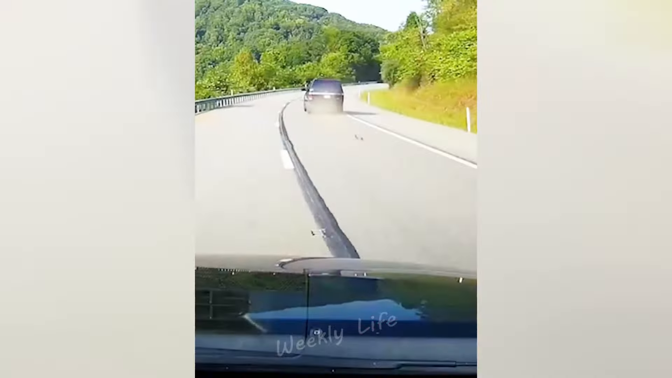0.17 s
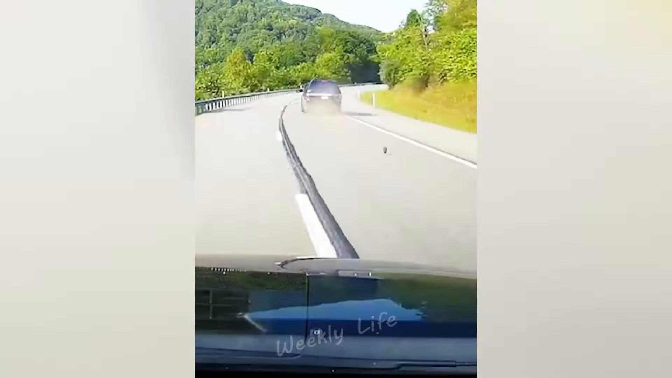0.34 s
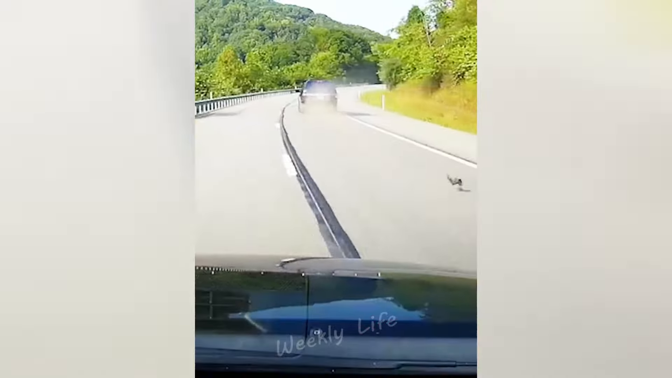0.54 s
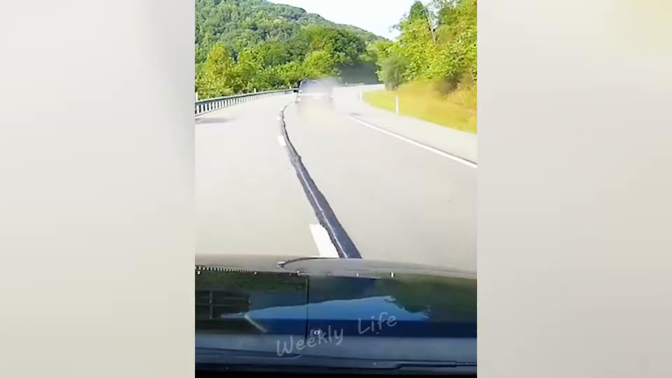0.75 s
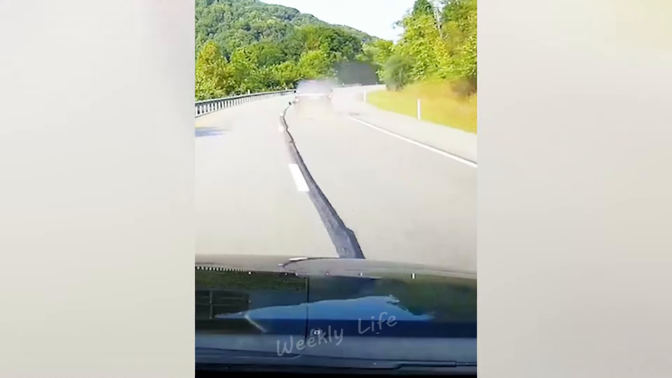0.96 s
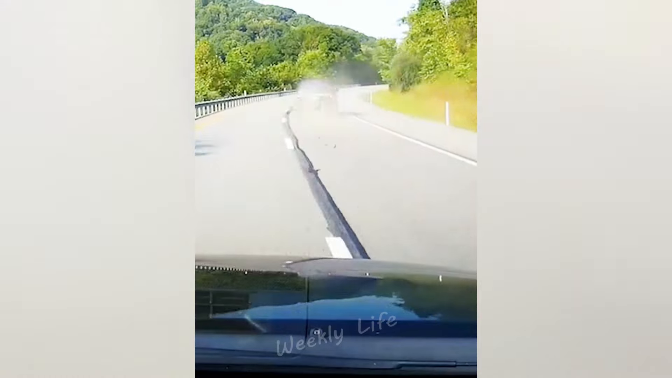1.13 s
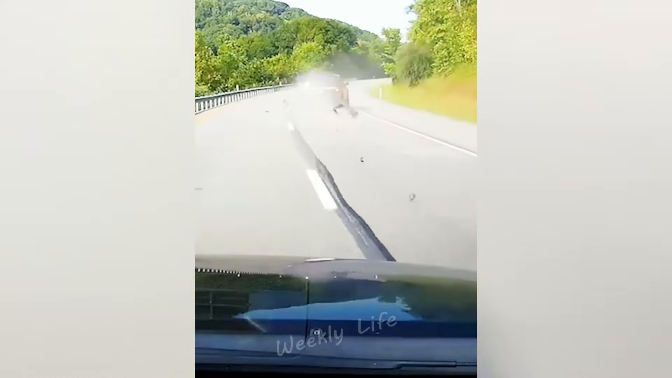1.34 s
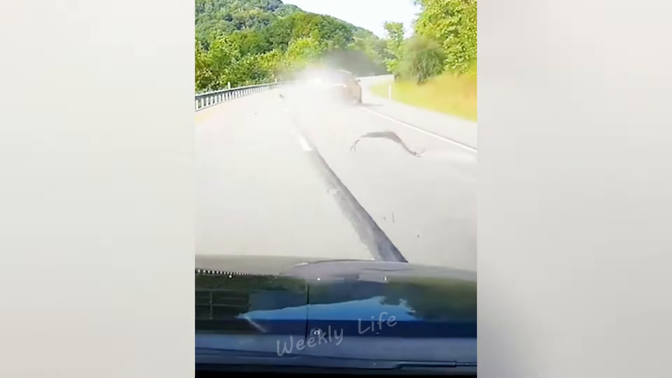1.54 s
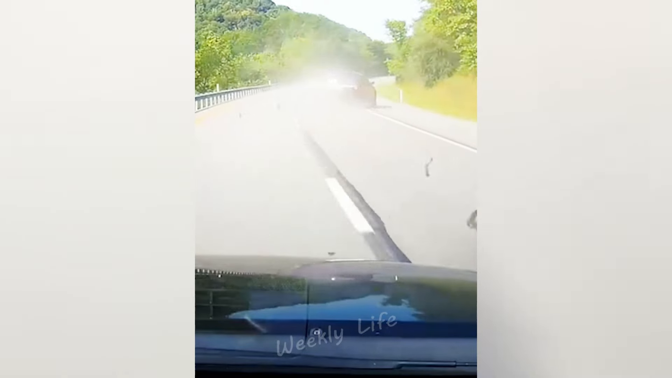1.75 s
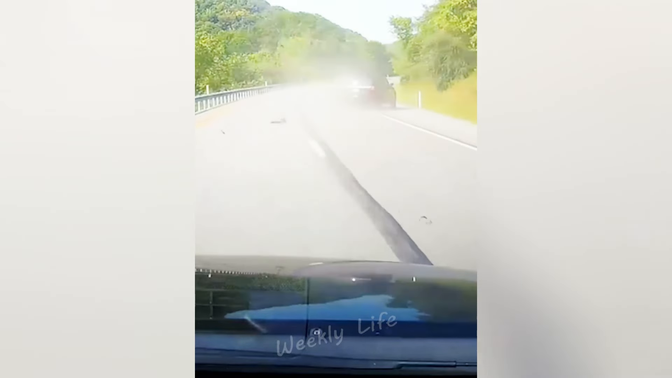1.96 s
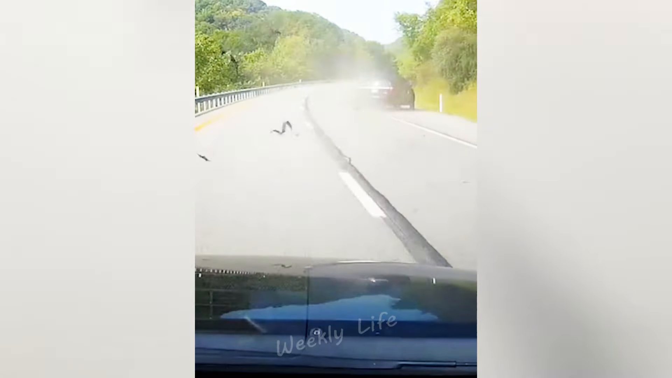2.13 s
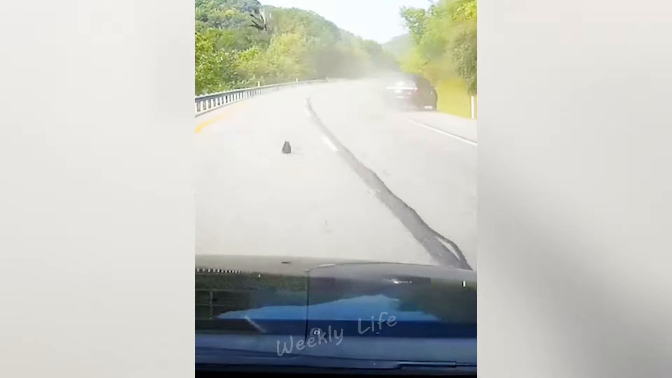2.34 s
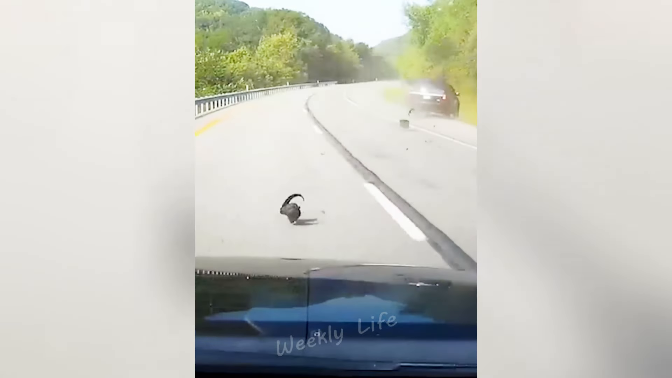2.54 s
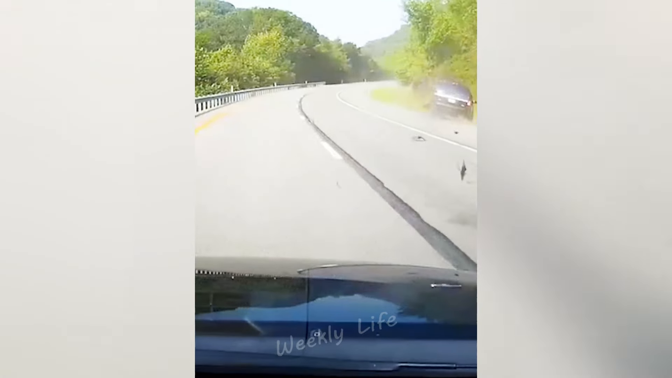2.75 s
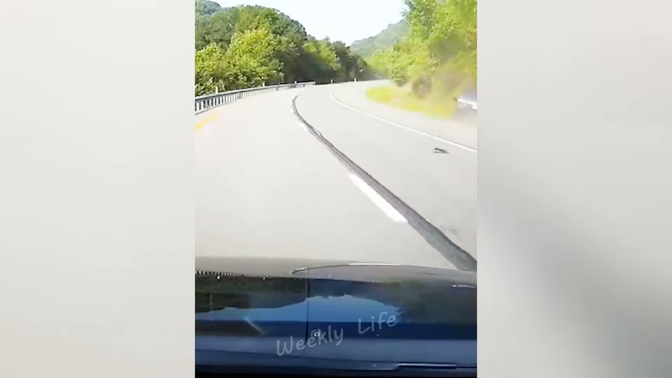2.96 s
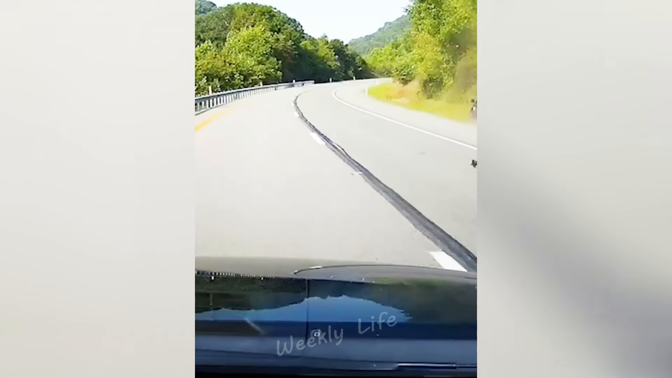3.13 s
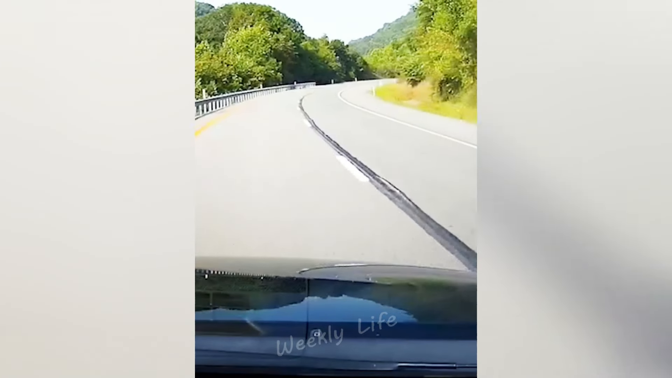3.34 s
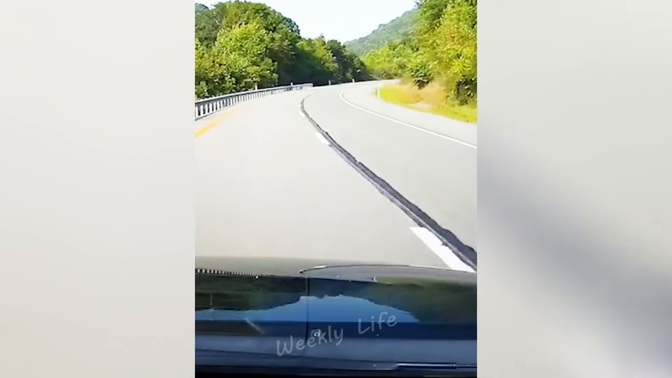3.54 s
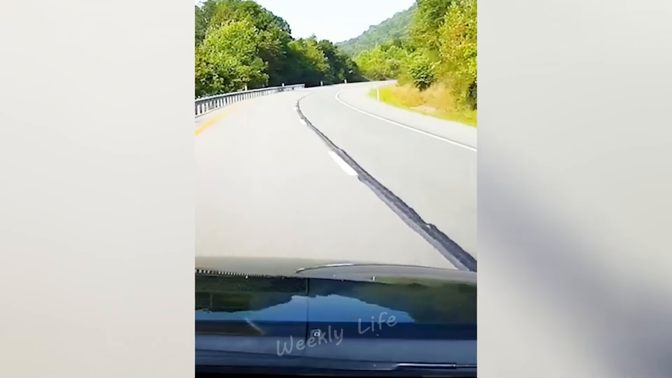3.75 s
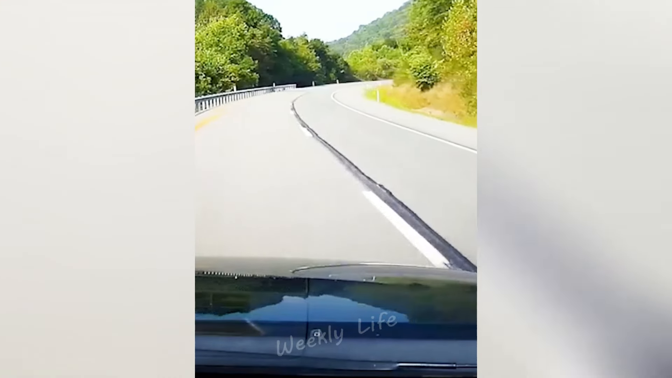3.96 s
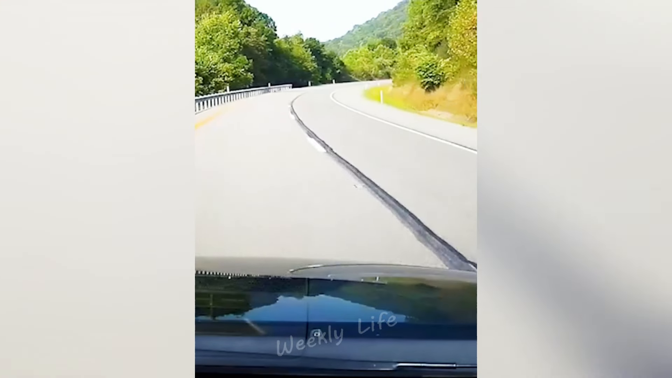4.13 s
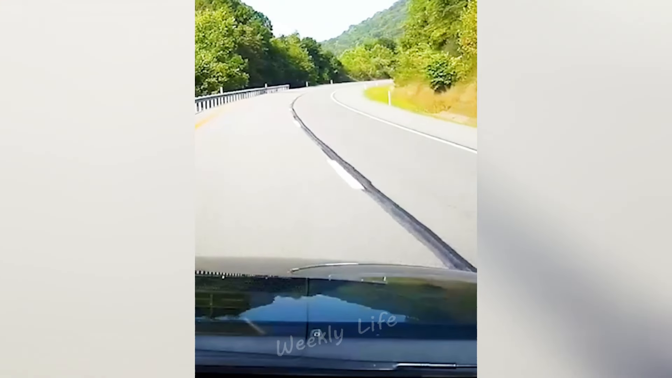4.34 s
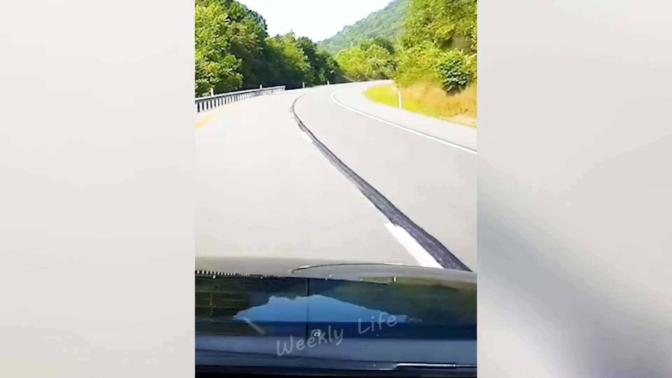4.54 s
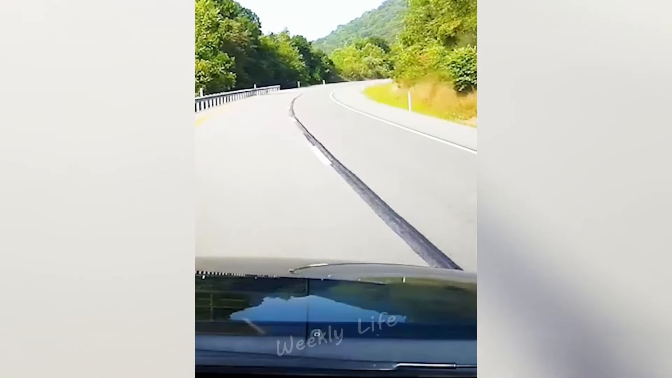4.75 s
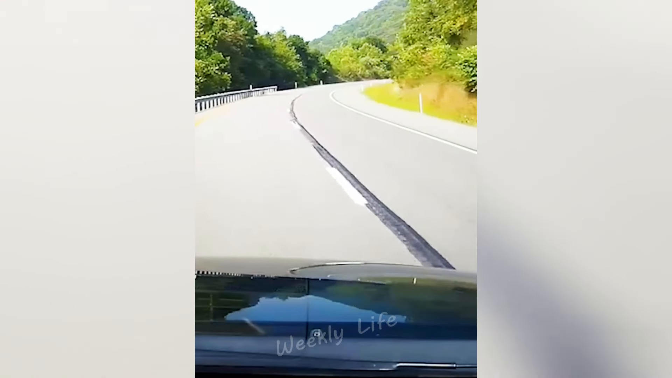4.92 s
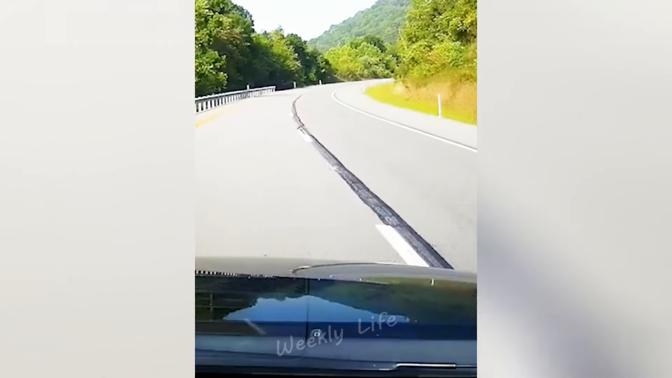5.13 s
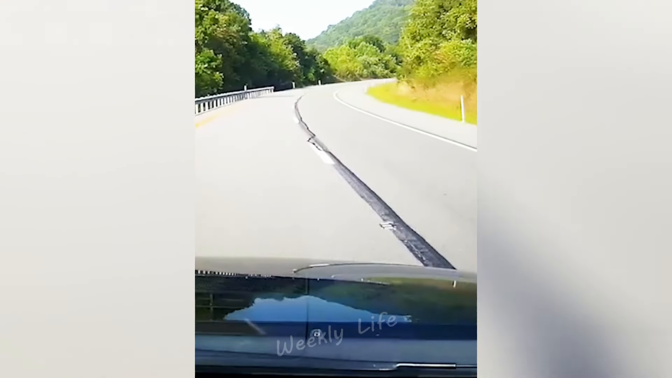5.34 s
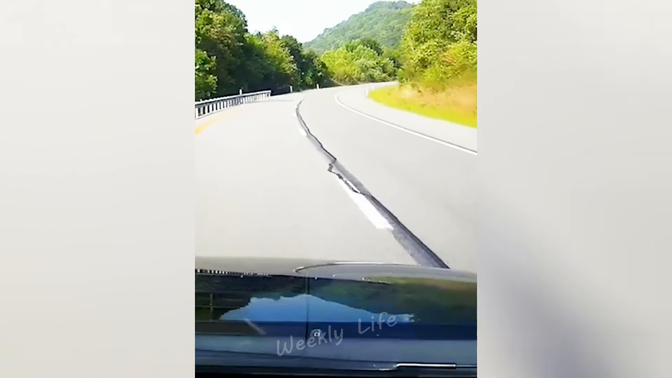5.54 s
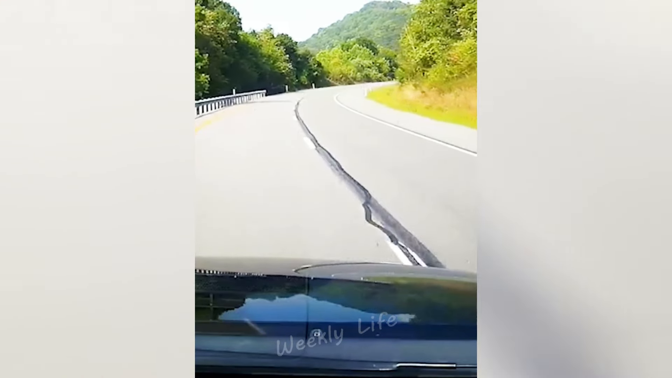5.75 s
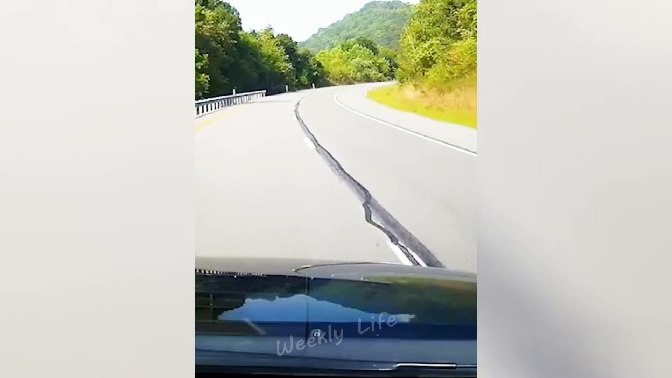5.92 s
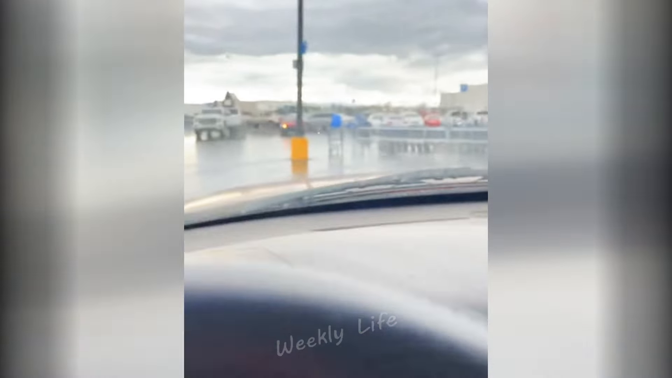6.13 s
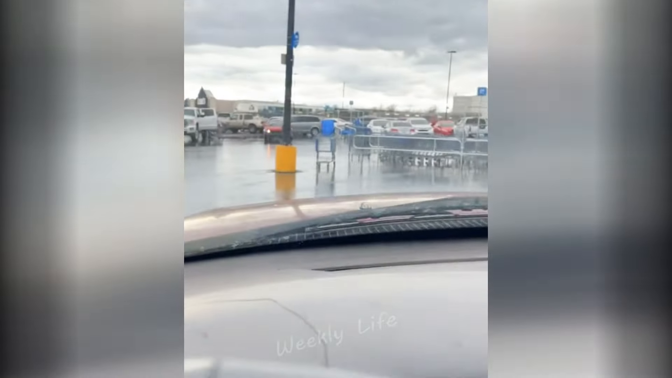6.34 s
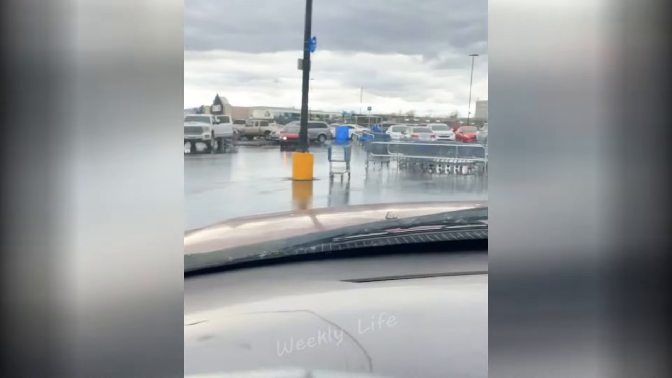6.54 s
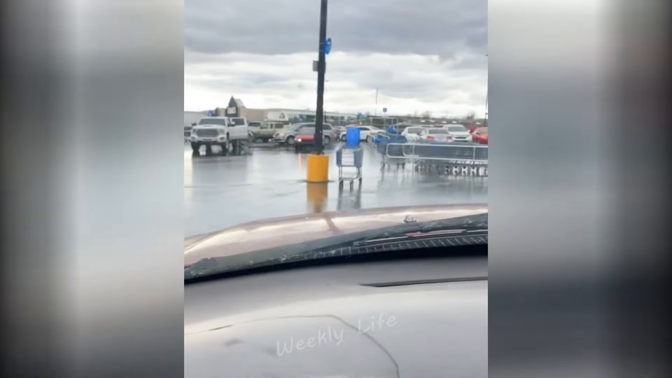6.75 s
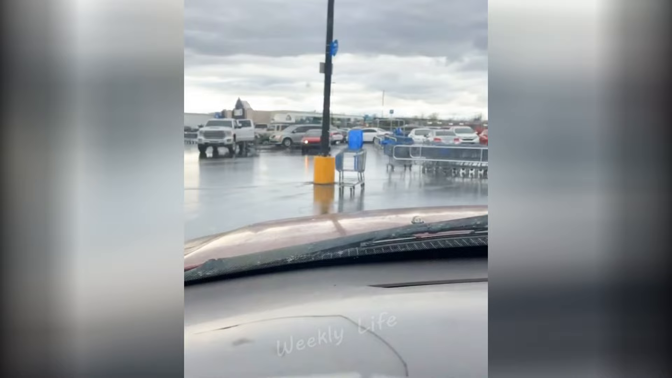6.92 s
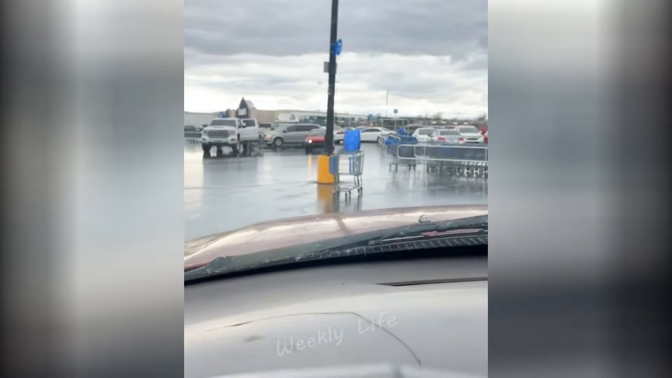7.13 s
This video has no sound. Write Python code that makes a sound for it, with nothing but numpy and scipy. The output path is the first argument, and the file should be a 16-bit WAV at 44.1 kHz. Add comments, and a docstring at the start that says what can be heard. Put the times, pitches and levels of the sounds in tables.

```python
"""A car ahead skids on a country road: its tyres squeal in wandering partials. In our cabin, bumps over road seams
and knocks on the body thud as short-lived panel tones, the hardest overloading the microphone; ticks and scrapes,
some of them the bright cracks of the blows, are swelling bursts of noise. Around them lie tyre roar, wind and dust
as coloured noise, and a wavering low boom. After a short silence comes a second cabin: a parked car idles as rumbling
noise in hissing rain, while a wiper rubs and rings the glass, clicks, and its motor hums. Both channels are alike."""
import sys
import numpy as np
from scipy import signal
from scipy.fft import rfft, irfft, next_fast_len
from scipy.io import wavfile
from scipy.ndimage import uniform_filter1d

SR = 44100
rng = np.random.default_rng(int(sys.argv[2]) if len(sys.argv) > 2 else 0)


def pcm_store(signal):
    """Save signal as 16-bit PCM."""
    levels = np.round(np.clip(np.atleast_2d(signal), -1, 1) * 32767)
    wavfile.write(sys.argv[1], SR, levels.astype(np.int16).T)


N = 316638
T = np.arange(N) / SR

# Every *_COLOUR table is a noise spectrum: frequency_hz, relative_density_db (per Hz)

# Tyre roar, falling as the car slows after the skid: time_s, level_db
ROAR_LEVEL = [(0.0, -27), (1.33, -28.5), (2.7, -30.5), (2.95, -35), (4.95, -35), (5.68, -38.5)]
# Tyres on the road surface: frequency_hz, relative_density_db
ROAR_COLOUR = [(30, 7), (55, 3), (80, 6), (120, 2.5), (160, -2), (240, -0.5), (330, -6), (520, -9.5),
               (800, -13), (1050, -15.5), (1350, -22.5), (1700, -33.5), (2300, -45), (4000, -50.5)]
# Air rings in the tyres and the cabin: pitch_hz, width_hz (of each of two passes), level_db (against the roar)
AIR_RINGS = [(104.3, 19.3, -6.5), (548.2, 56, -16.5)]
# Boom of the whole body, strong under braking: time_s, level_db
BOOM_LEVEL = [(0, -39), (.8, -37), (1.25, -30), (2.35, -28.5), (2.5, -35), (2.9, -28.5), (3.1, -40.5),
              (5.7, -37.5)]
BOOM_HZ = 29.3
# Dust blown against the glass, thickest behind the skid: time_s, level_db
DUST_LEVEL = [(0, -56), (1.78, -58), (1.85, -50.5), (1.98, -50.5), (2.03, -57.5), (2.3, -48), (2.36, -69),
              (2.5, -52.5), (2.95, -59), (3.3, -68), (5.7, -71.5)]
# Dust on the glass: frequency_hz, relative_density_db
DUST_COLOUR = [(1200, 3.5), (1900, 5.5), (2800, -1.5), (4200, -6), (6500, -6), (7600, -12.5), (8500, -17.5),
               (13000, -22), (15800, -24.5)]
# Steady wind hiss: frequency_hz, relative_density_db
WIND_COLOUR = [(1500, -8.5), (2500, -5.5), (6500, -9), (8300, -13.5), (13500, -10), (15800, -28.5)]
WIND_DB = -72

# Steady rain: frequency_hz, relative_density_db
RAIN_COLOUR = [(1200, -10), (2000, -1.5), (3500, -4.5), (6200, -19), (7000, -24.5), (10000, -34),
               (13500, -34), (14500, -22), (15800, -21)]
RAIN_DB = -55
# Bright front of the splash: frequency_hz, relative_density_db
SPIT_COLOUR = [(3200, -15), (4400, 4), (5900, 0), (6600, -12), (10000, -19), (12000, -30)]
SPLASH_S, SPLASH_DB, SPLASH_T60_S = 6.392, 4.5, 0.33  # burst added to the rain, dB against its steady level
SPIT_DB, SPIT_T60_S = -51, 0.18

# Engine at idle: frequency_hz, relative_density_db
IDLE_COLOUR = [(12, -63.5), (20, -25), (37, -6), (85, 1.5), (157, -7.5), (203, -16), (354, -22.5),
               (414, -30), (600, -25.5), (780, -30.5), (1320, -120)]
IDLE_DB, IDLE_LIFT_DB = -23.5, 3.5  # rumble at rest, and its lift at the height of the strongest stroke

# Spans of a thin whine that comes and goes: start_s, end_s
WHINE_SPANS = [(6.01, 6.35), (6.81, 7.2)]
WHINE_HZ, WHINE_PEAK_DB = 15332, -66

# Wiper strokes: start_s, rise_s, hold_s (of the blade), rub_db, motor_hum_peak_db, glass_ring_db
WIPER_STROKES = [(5.877, 0.17, 0.12, -42.5, -30.5, -37.5), (6.66, 0.15, 0.088, -24, -26.5, -33)]
RISE_POWER = 0.55  # the stroke bites at once, then gains slowly
# Blade rubbing on the glass: frequency_hz, relative_density_db
RUB_COLOUR = [(150, -42), (250, -6), (296, -27.5), (349, -8), (402, -14), (742, -8), (841, -3),
              (1310, -11.5), (1850, -15.5), (2600, -26), (3900, -42.5), (7000, -56.5), (9100, -79.5),
              (15400, -120)]
RUB_FLOOR_DB, RUB_FALL_DB_PER_S = -41.5, 45  # steady wet rub beneath the strokes; fall after each hold
GLASS_RING_HZ, GLASS_PASS_WIDTH_HZ = 850, 80  # the ring is filtered twice at this width
MOTOR_HZ, HUM_FALL_DB_PER_S = 356.7, 300
HUM_LATE_S, HUM_LENGTH_S = 0.022, 0.264  # hum starts behind the blade, and starts to fall this long after
# The blade turns over and chatters: time_s, level_db
BLADE_CLICKS = [(6.335, -38.5), (6.341, -34), (6.356, -42), (6.368, -52), (6.503, -45)]
# Tones within each click: pitch_hz, level_db (against the click), t60_s
CLICK_TONES = [(1150, -4, .04), (1540, -3, 0.055), (1740, -3, .04), (2200, 4.5, 0.037), (2357, 6, 0.043),
               (2775, 4.5, 0.034), (3300, -8, 0.04)]
DIP_S, DIP_WIDTH_S = 6.015, 0.008  # the level of rumble, rub and hum dips briefly

# Ticks, scrapes and cracks of blows: time_s, bright_level_db (at the top of the swell),
# low_share_db (against the bright part), swell_s
TICK_EVENTS = [(0.772, -54.5, 11, 0.01), (0.837, -49, 2, .004), (0.925, -43.5, 3.5, 0.005),
               (1.114, -58, 8.5, 0.0051), (1.283, -58, 21, 0.0066), (1.347, -42.5, 0, 0.0047),
               (1.49, -55.5, 4.5, 0.0045), (1.545, -45, 1, 0.0035), (1.595, -59, 3, 0.029),
               (1.673, -49, -5, 0.0043), (1.774, -52.5, 9, 0.0078), (1.838, -49.5, -18, 0.018),
               (1.901, -49.5, 2, 0.0069), (1.935, -47.5, 5.5, 0.0038), (2.062, -54.5, 1, 0.011),
               (2.115, -53, 8.5, 0.0087), (2.135, -53.5, 13.5, 0.014), (2.174, -45.5, 20.5, 0.0089),
               (2.186, -42.5, 24.5, 0.0056), (2.254, -35.5, 1.5, 0.0021), (2.266, -33, 7, 0.002),
               (2.289, -36, -6, .003), (2.294, -30, 12.5, 0.0013), (2.2988, -22, 14, 0.0014),
               (2.305, -24.5, 21, 0.00099), (2.307, -37, 6, 0.0067), (2.362, -65.5, 21.5, 0.0037),
               (2.482, -46.5, 8, 0.003), (2.519, -46, -7, 0.0029), (2.529, -42.5, 5, 0.0059),
               (2.56, -47, 16.5, 0.002), (2.6, -74, 14, 0.0072), (2.646, -66, 29, 0.004),
               (2.654, -62, 17, .008), (2.668, -70, 27, .007), (2.759, -58.5, -1, 0.0084),
               (2.837, -51, 2.5, 0.0044), (3.196, -50.5, 7, 0.0071), (3.242, -56.5, 2, 0.0041),
               (3.609, -67, 22, 0.013), (4.692, -69, 12, .003)]
# Bright part of a tick: frequency_hz, relative_density_db
CRACK_COLOUR = [(2600, -10.0), (4000, -1.5), (6500, 7.0), (7800, 1.5), (8800, -4.0), (12500, -13.0), (15800, -29.0)]
SOFT_FROM_DB, SOFT_SPAN_DB = 15, 7  # low share above which the tap gives way to a lower knock, and over what span

# Bumps and knocks on the body: time_s, tone_peak_db, contact_s, panel_pitch_hz, rattle_db (against the tone)
BLOWS = [(.069, -30, 0.029, 522, -8.5), (.158, -37.5, 0.018, 570, 4), (0.255, -24.5, 0.015, 538, -17),
         (.339, -24.5, 0.023, 205, -1.5), (.43, -31, 0.019, 472, -6.5), (.622, -26.5, 0.0094, 550, -17),
         (0.915, -17.5, 0.023, 109.4, -13), (2.122, -27, 0.01, 700, -9), (2.135, -25, 0.006, 880, -7),
         (2.143, -22, .003, 400, -15), (2.149, -25, .006, 950, -6), (2.159, -26, .006, 780, -6),
         (2.173, -4, 0.027, 280, -9), (2.2946, 3, .0155, 212, -13), (2.363, -13.5, 0.011, 44.3, -55),
         (2.6, -24.5, 0.0456, 572, 0), (2.604, -21.5, 0.056, 239, -12), (2.648, -20.5, 0.038, 127, -10),
         (2.726, -11, .012, 200, -22), (2.73, -21, .017, 430, -6), (2.812, -20.5, 0.035, 95.7, -23),
         (2.851, -22, 0.032, 97.4, -18), (3.61, -31, .011, 390, -7), (3.612, -36, .02, 950, -3),
         (4.68, -36, .016, 940, -16), (5.697, -40, 0.0081, 607, 3.5)]
# Loose trim: frequency_hz, relative_density_db
RATTLE_COLOUR = [(90, 1), (200, 8), (600, 1.5), (900, -1.5), (1400, -13.5), (2600, -40), (3600, -38.5),
                 (7000, -62.5)]
RISE_CYCLES, FALL_CYCLES = 0.41, 0.77  # how a struck panel starts and dies
UNEVEN = 0.18  # relative pitch wobble of a panel whose rattle is as strong as its blow

# Skidding tyres ahead: time_s, stick_slip_hz, first_partial_db, second_partial_db
SKID = [(1.0, 742, -56, -68), (1.1, 740, -47, -62), (1.125, 738, -39, -60), (1.17, 742, -40, -58),
        (1.2, 722, -47, -47), (1.23, 740, -42, -53), (1.27, 750, -42, -53), (1.32, 775, -38, -58),
        (1.36, 735, -41, -60), (1.4, 770, -38, -58), (1.44, 745, -41, -51), (1.48, 780, -38, -60),
        (1.52, 785, -40, -56), (1.54, 750, -38, -48), (1.59, 760, -37, -49), (1.605, 722, -39, -40),
        (1.635, 722, -40, -40), (1.665, 728, -41, -48), (1.685, 714, -41, -39), (1.72, 714, -41, -40),
        (1.73, 800, -33, -58), (1.765, 778, -33, -50), (1.79, 778, -34, -44), (1.84, 815, -34, -60),
        (1.87, 815, -47, -66), (1.91, 790, -38, -62), (1.95, 785, -37, -58), (1.958, 724, -38, -44),
        (1.985, 724, -38, -41), (1.995, 748, -38, -42), (2.045, 748, -37, -45), (2.055, 724, -41, -41),
        (2.075, 726, -40, -42), (2.09, 748, -39, -41), (2.11, 750, -38, -43), (2.14, 762, -35, -50),
        (2.17, 760, -60, -65), (2.25, 760, -37, -46), (2.29, 765, -38, -50), (2.33, 765, -65, -70),
        (2.4, 768, -52, -56), (2.435, 768, -37, -52), (2.53, 735, -44, -51), (2.57, 730, -65, -70)]

SILENCE_START_S, SILENCE_END_S = 5.721, 5.893
CEILING = 0.74  # microphone overload, of full scale
TOP_HZ = 15900


def undb(db):
    """Decibels to a linear gain."""
    return 10 ** (np.asarray(db) / 20)


def unit(x):
    """Scale to an rms of 1."""
    return x / np.sqrt(np.mean(x ** 2))


def curves(table):
    """Draw each column after the first as a straight-line curve over time."""
    times, *columns = np.transpose(table)
    return [np.interp(T, times, column) for column in columns]


def walk(rate):
    """Random levels held 1 / rate s and slewed twice; spread near 1."""
    hold = int(SR / rate)
    steps = np.repeat(rng.standard_normal(N // hold + 1), hold)
    slewed = uniform_filter1d(uniform_filter1d(steps, hold), hold)
    return unit(slewed[:N])


def noise(colour, flicker_db=0., shared_db=0., rate=12.):
    """Coloured noise, rms 1; given a flicker, its octave bands waver both alone and all together."""
    size = next_fast_len(N)
    octave = np.log2(np.maximum(np.arange(size // 2 + 1) * SR / size, 1))
    hz, db = np.transpose(colour)
    density_db = np.interp(octave, np.log2(hz), db, left=-200, right=-200)
    spectrum = rfft(rng.standard_normal(size)) * undb(density_db)
    if not flicker_db:
        return unit(irfft(spectrum, size)[:N])
    out = 0
    shared = shared_db * walk(rate)
    for centre in range(4, 15):
        # neighbouring bands crossfade and sum to one
        share = np.cos(np.pi / 2 * np.clip(octave - centre, -1, 1)) ** 2
        band = irfft(spectrum * share, size)[:N]
        out = out + band * undb(shared + flicker_db * walk(rate))
    return unit(out)


def ring(hz, width_hz):
    """Noise through one resonance twice, for steep skirts; rms 1."""
    b, a = signal.iirpeak(hz, hz / width_hz, fs=SR)
    once = signal.lfilter(b, a, rng.standard_normal(N))
    return unit(signal.lfilter(b, a, once))


def decay(t, t60, rise):
    """Quick rise over an exponential fall of 60 dB per t60."""
    return np.minimum(t / rise, 1) * np.exp(-np.log(1000) * t / t60)


def after(s):
    """The samples of the half second that follows s, and their times since s."""
    part = slice(int(s * SR), int(s * SR) + SR // 2)
    return part, np.maximum(T[part] - s, 0)


def stroke(s, rise, hold, fall_db_per_s):
    """Envelope of one stroke: rise, hold, then a fall of so many dB a second."""
    up = np.clip((T - s) / rise, 0, 1) ** RISE_POWER
    return up * undb(-fall_db_per_s * np.maximum(T - s - rise - hold, 0))


def wind_and_dust():
    """Steady wind hiss, and dust against the glass as lumpy bright noise."""
    dust = undb(curves(DUST_LEVEL)[0]) * noise(DUST_COLOUR, 1.2, 1.1, 32.97)
    return dust + undb(WIND_DB) * noise(WIND_COLOUR)


def body_boom():
    """The whole body booms as a low sine whose pitch and level waver."""
    phase = 2 * np.pi * np.cumsum(BOOM_HZ * (1 + 0.082 * walk(12.0))) / SR
    level = undb(curves(BOOM_LEVEL)[0] + 4.5 * walk(11.0))
    return level * np.sqrt(2) * np.sin(phase)


def tyre_roar():
    """Tyre noise, lumpy with the surface, together with resonances of the enclosed air."""
    rings = sum(undb(db + 2.5 * walk(5.)) * ring(hz, width_hz) for hz, width_hz, db in AIR_RINGS)
    return undb(curves(ROAR_LEVEL)[0]) * (noise(ROAR_COLOUR, 1.3, 1.1, 14.) + rings)


def rain():
    """Flickering rain hiss that jumps once in a splash with a bright front."""
    t = np.maximum(T - SPLASH_S, 0)
    swell = 1 + undb(SPLASH_DB) * decay(t, SPLASH_T60_S, 0.0067)
    spit = undb(SPIT_DB) * decay(t, SPIT_T60_S, 0.0038) * noise(SPIT_COLOUR)
    return swell * undb(RAIN_DB) * noise(RAIN_COLOUR, 1.4, 1.2, 17.0) + spit


def whine():
    """A thin, very high sine that switches on and off."""
    gate = sum((T > start) & (T < end) for start, end in WHINE_SPANS)
    return gate * undb(WHINE_PEAK_DB) * np.sin(2 * np.pi * WHINE_HZ * T)


def idle_rumble(sweep):
    """Low engine noise that lifts with the wiper's sweep."""
    return undb(IDLE_DB + IDLE_LIFT_DB * sweep / sweep.max()) * noise(IDLE_COLOUR, 0.68, 1.4, 25.0)


def wiper_motor():
    """The motor hums as a sine, wavering in pitch and level, during each stroke."""
    level = sum(undb(hum_db) * stroke(s + HUM_LATE_S, rise, HUM_LENGTH_S - rise, HUM_FALL_DB_PER_S)
                for s, rise, _, _, hum_db, _ in WIPER_STROKES)
    phase = 2 * np.pi * np.cumsum(MOTOR_HZ * (1 + 0.00587 * walk(30.))) / SR
    return level * undb(2.5 * walk(35.0)) * np.sin(phase)


def blade_clicks():
    """The turning blade clicks as a cluster of short decaying tones."""
    return sum(undb(db + tone_db) * decay(np.maximum(T - s, 0), t60, 0.004) * np.sin(2 * np.pi * hz * (T - s))
               for s, db in BLADE_CLICKS for hz, tone_db, t60 in CLICK_TONES)


def wiper_sweep():
    """Gain of the rubbing blade across all strokes."""
    return sum(undb(rub_db) * stroke(s, rise, hold, RUB_FALL_DB_PER_S)
               for s, rise, hold, rub_db, _, _ in WIPER_STROKES)


def wiper_rub(sweep):
    """The blade's friction is coloured noise, and it sets off one resonance of the glass."""
    ringing = sum(undb(ring_db) * stroke(s, rise, hold, RUB_FALL_DB_PER_S)
                  for s, rise, hold, _, _, ring_db in WIPER_STROKES)
    friction = (sweep + undb(RUB_FLOOR_DB)) * noise(RUB_COLOUR, 1.1, .9, 60.)
    return friction + ringing * ring(GLASS_RING_HZ, GLASS_PASS_WIDTH_HZ)


def parked():
    """The second cabin: idle, rub and hum share a brief dip, with rain, whine and clicks on top."""
    sweep = wiper_sweep()
    dip = 1 - 0.95 * np.exp(-((T - DIP_S) / DIP_WIDTH_S) ** 2)
    dipped = dip * (idle_rumble(sweep) + wiper_rub(sweep) + wiper_motor())
    return dipped + whine() + blade_clicks() + rain()


def ticks_and_cracks():
    """Each tick, scrape or crack is bright noise with a duller resonant tap, swelling and dying over some ms."""
    out = np.zeros(N)
    tap, knock = ring(1700, 2200), ring(1200, 1300)
    crack = noise(CRACK_COLOUR)
    for s, db, low_db, swell in TICK_EVENTS:
        part, t = after(s)
        soft = np.clip((low_db - SOFT_FROM_DB) / SOFT_SPAN_DB, 0, 1)
        low = np.sqrt(1 - soft) * tap[part] + np.sqrt(soft) * knock[part]
        envelope = t / swell * np.exp(1 - t / swell)
        out[part] += undb(db) * envelope * (crack[part] + undb(low_db) * low)
    return out


def body_thuds():
    """A panel is shaken unevenly during contact and dies within a few cycles; loose trim rattles on."""
    out = np.zeros(N)
    rattle, shake = noise(RATTLE_COLOUR, 1.5, 1.5, 120.), walk(150.)
    for s, db, contact, hz, rattle_db in BLOWS:
        part, t = after(s)
        start = np.minimum(t * hz / RISE_CYCLES, 1)
        push = start * np.exp(-np.maximum(t - contact, 0) / (0.00056 + FALL_CYCLES / hz))
        # a hard blow stretches the panel, so its pitch starts high and sags
        sag = 0.051 * min(undb(db), 1) * (1 - 2 * np.minimum(t / contact, 1))
        wobble = UNEVEN * undb(rattle_db) * shake[part]
        panel = push * np.sin(2 * np.pi * np.cumsum(hz * (1 + sag + wobble)) / SR)
        trim = (push + 0.4 * decay(t, 0.2, 0.0063)) * rattle[part]
        out[part] += undb(db) * (panel + undb(rattle_db) * trim)
    return out


def tyre_squeal():
    """Rubber sticks and slips: three partials whose rate trembles and whose strength breaks up."""
    hz, first_db, second_db = curves(SKID)
    jitter = walk(250.)
    jitter = jitter - uniform_filter1d(jitter, SR // 20)  # quick trembling without drift
    phase = 2 * np.pi * np.cumsum(hz * (1 + .003 * walk(70.) + .013 * jitter)) / SR
    first = undb(first_db + 2.5 * walk(70.)) * np.sin(phase)
    upper = undb(second_db + 2.5 * walk(60.)) * (np.sin(2 * phase) + .09 * np.sin(3 * phase))
    skidding = (T > SKID[0][0]) & (T < SKID[-1][0])
    return skidding * np.sqrt(2) * (first + upper)


def scene():
    """The moving cabin, a short silence, then the parked cabin, alike in both channels."""
    fade = 0.002  # s; the parked cabin opens in half of it
    moving = wind_and_dust() + body_boom() + tyre_roar() + ticks_and_cracks() + body_thuds() + tyre_squeal()
    moving = moving * np.clip((SILENCE_START_S - T) / fade, 0, 1)
    mono = moving + parked() * np.clip(2 * (T - SILENCE_END_S) / fade, 0, 1)
    return np.array([mono, mono])


def record(dry):
    """The loudest blows hit the microphone's hard ceiling; a steep low-pass cuts the top."""
    clipped = np.clip(dry, -CEILING, CEILING)
    return signal.sosfilt(signal.ellip(10, .2, 80, TOP_HZ, fs=SR, output="sos"), clipped)


dry = scene()
out = record(dry)
pcm_store(out)
```